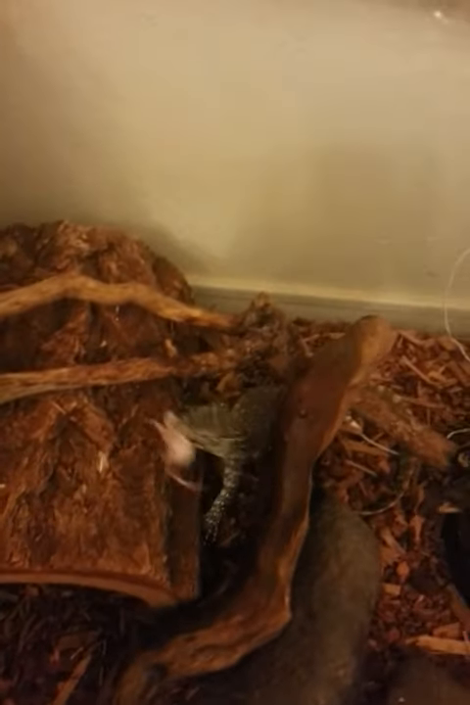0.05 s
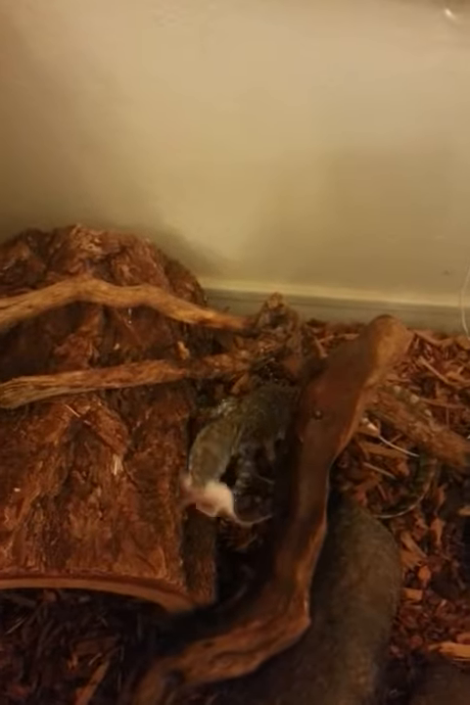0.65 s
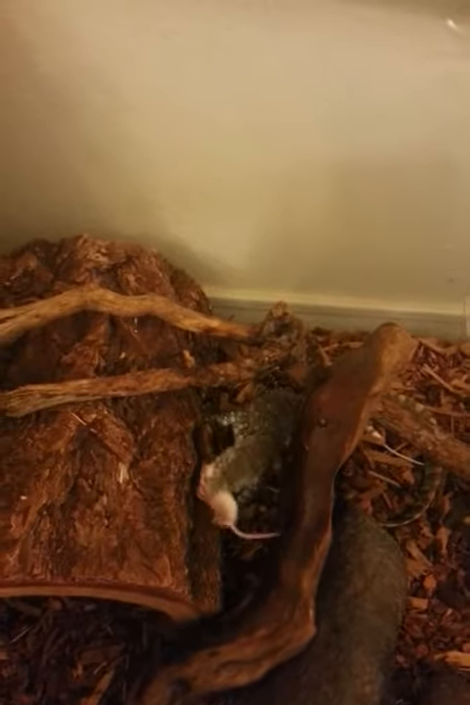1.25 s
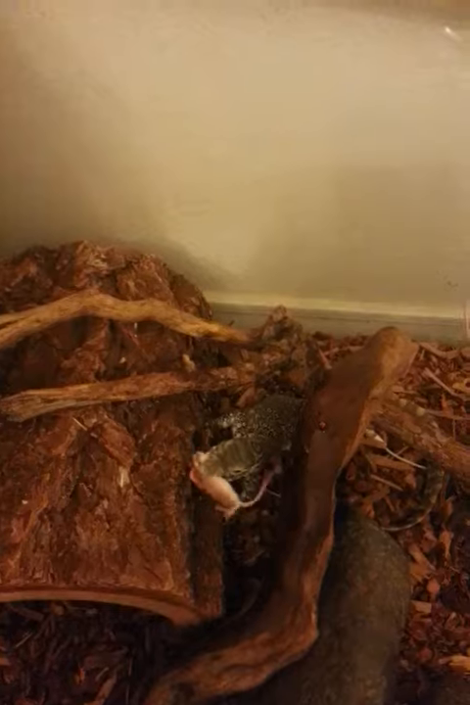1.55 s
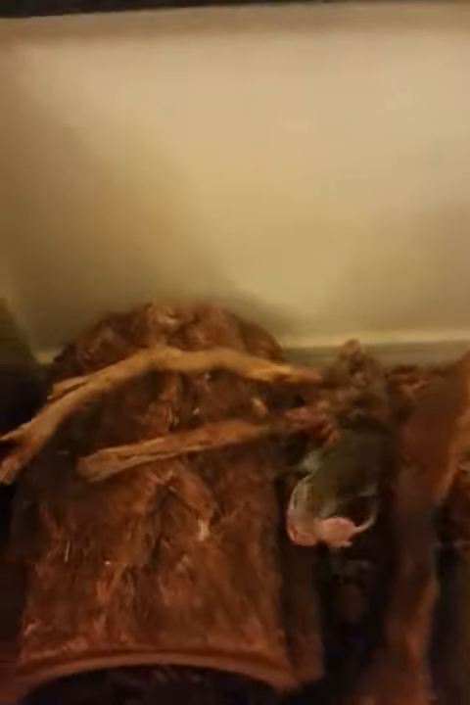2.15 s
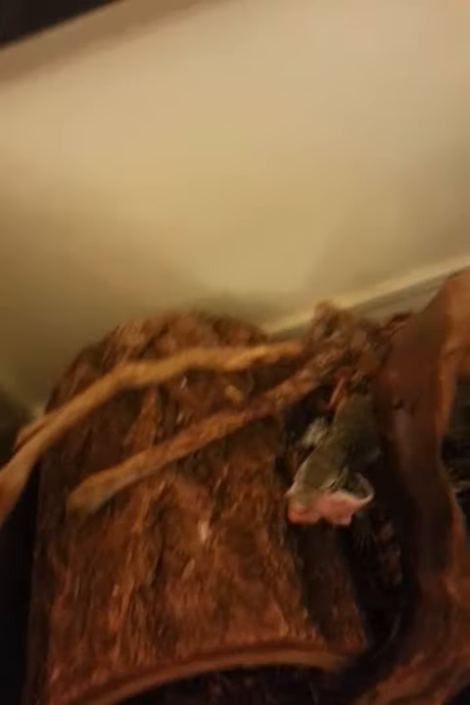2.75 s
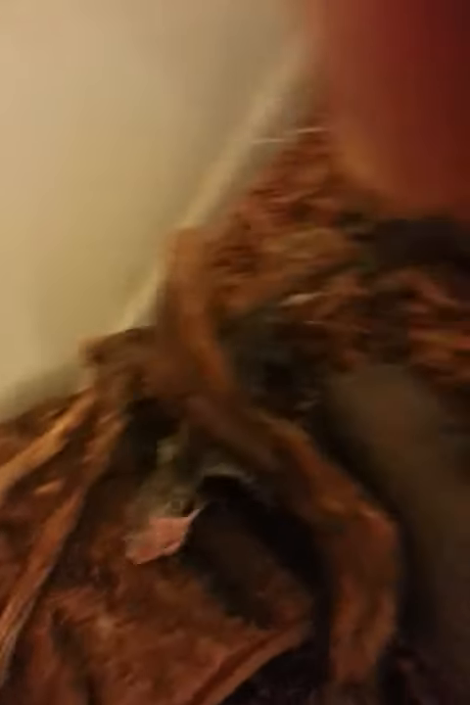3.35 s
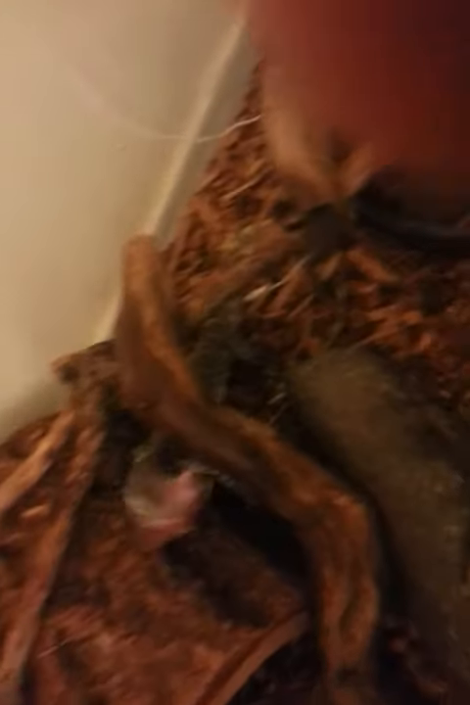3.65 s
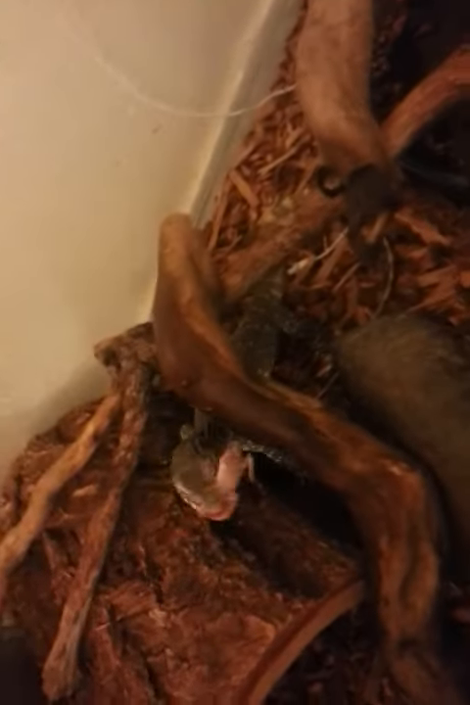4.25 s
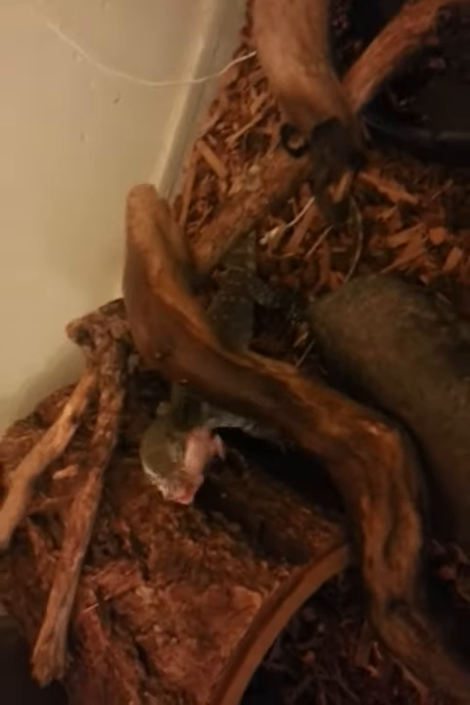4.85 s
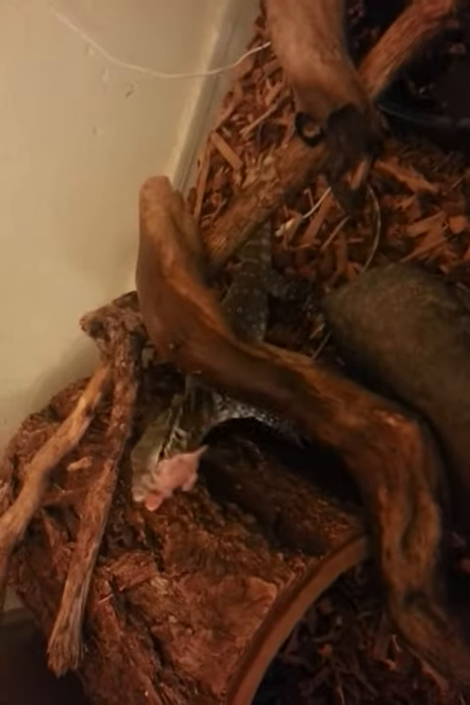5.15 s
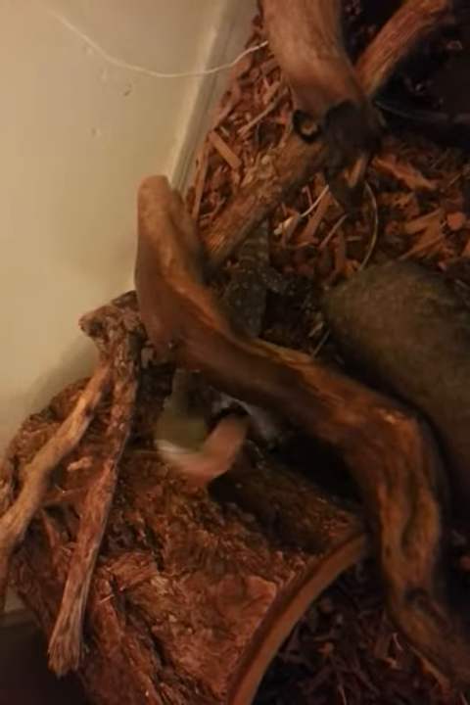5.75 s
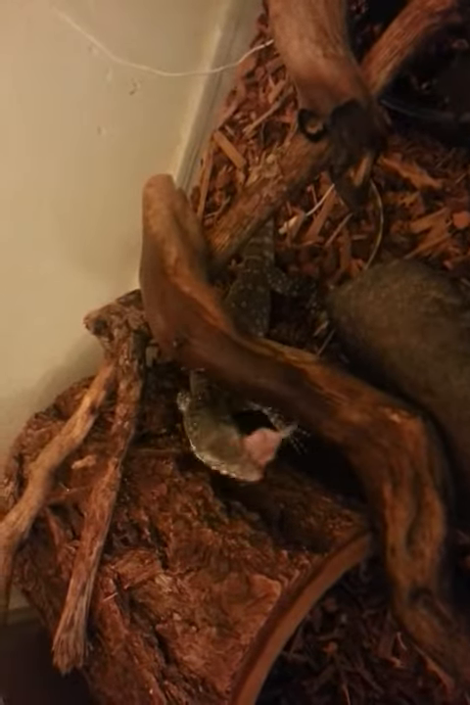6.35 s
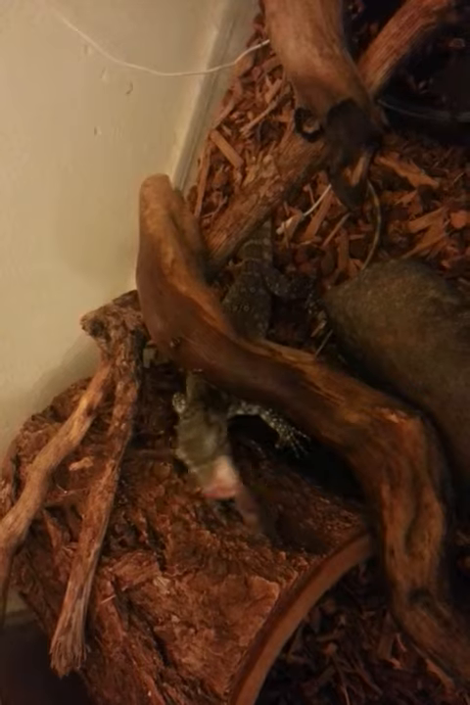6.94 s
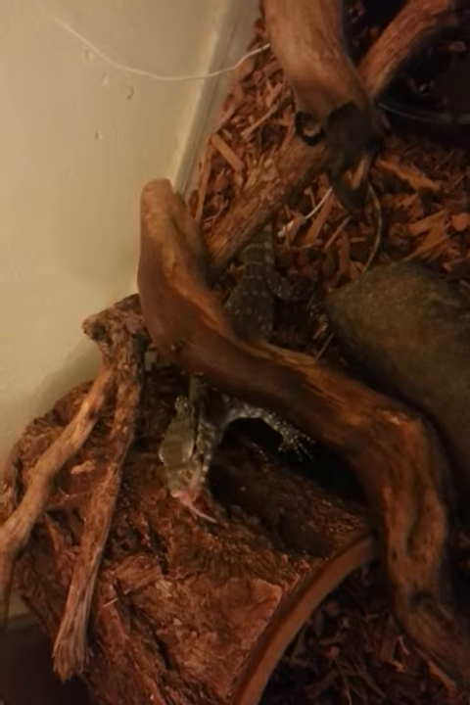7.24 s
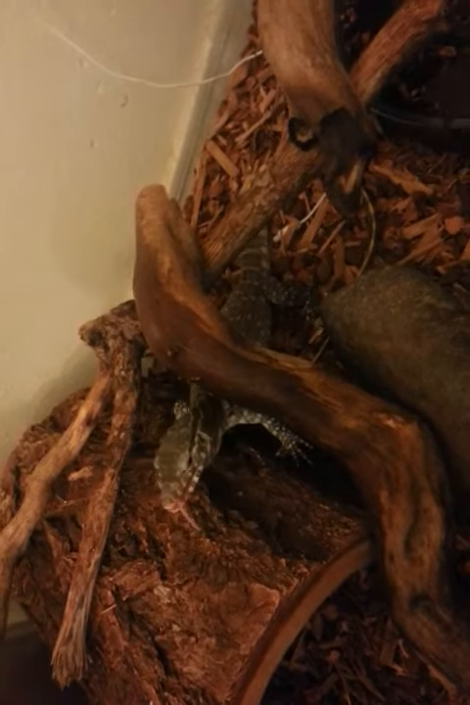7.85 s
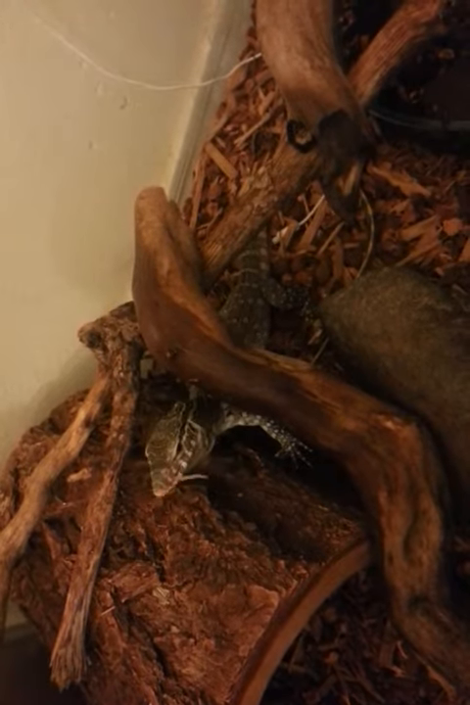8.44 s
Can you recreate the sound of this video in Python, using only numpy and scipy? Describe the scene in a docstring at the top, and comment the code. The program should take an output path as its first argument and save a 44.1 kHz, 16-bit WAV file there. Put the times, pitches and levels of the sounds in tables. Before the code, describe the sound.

A lizard scrapes and ticks on dry bark, thrashing once against ringing glass, while fingers knock and rub on the microphone.

```python
"""A lizard shakes and swallows a mouse on a cork-bark hide in a vivarium, over a faint room hum.
From the start claws and prey scrape the bark and dry chips tick; at 0.5 s one hard thrash sets
something ringing, probably the tank's glass. From 1.9 to 4.8 s fingers rub and knock beside a phone's
two microphone ports, with one long slide at 3 s. Then the lizard's scattered jerks run on to the end."""
import sys
import numpy as np
from scipy import signal
from scipy.fft import rfft, irfft, next_fast_len
from scipy.io import wavfile

SR = 44100
rng = np.random.default_rng(int(sys.argv[2]) if len(sys.argv) > 2 else 0)


def unload_audio(sound):
    """Save the sound as a 16-bit wav file, at the path given as the first command line argument."""
    columns = np.transpose(np.atleast_2d(sound))
    # keep every value between -1 and 1, then stretch to whole-number steps
    steps = np.round(np.clip(columns, -1, 1) * 32767)
    wavfile.write(sys.argv[1], SR, steps.astype(np.int16))


N = 373968
TIME = np.arange(N) / SR

# the lizard's jerks, each a scrape that swells until a claw or chip snaps:
# (snap time [s], scrape level [dB], rise [s], snap level [dB], left minus right [dB])
JERKS = [(0.0345, -46, 0.006, -46.5, 8), (0.327, -58, 0.028, -50.5, -3), (0.34, -55.5, 0.0022, -57, -4),
         (0.398, -30.5, 0.015, -34.5, -10), (0.485, -54, 0.028, -62, 6), (0.751, -44, 0.02, -45.5, -4),
         (0.82, -42.5, 0.034, -42, -4), (0.8565, -65, 0.012, -45.5, -12), (0.907, -52, .011, -51, -3.5),
         (1.06, -41.5, 0.0035, -41.5, -4.5), (1.1982, -58, 0.014, -51.5, -1), (1.235, -46, 0.012, -63, -8),
         (1.264, -52, 0.0085, -49, 2.5), (1.2795, -64, .008, -51, 2.5), (1.394, -62, 0.037, -73, -2),
         (1.6903, -52.5, 0.018, -39.5, 0.5), (1.748, -57, 0.034, -58, -10), (2.1093, -54, .02, -50, -2.5),
         (2.494, -45.5, 0.0085, -60, -1.5), (4.817, -50.5, 0.0039, -73, -8), (4.8728, -48, 0.036, -49, -8),
         (4.942, -61, 0.0032, -56.5, -2), (5.2857, -35, 0.0062, -40, -1.5), (5.349, -61, 0.073, -60, 2.5),
         (5.42, -80, 0.0047, -67, 8), (5.614, -63, 0.021, -55, -1), (5.744, -46, 0.012, -54, -5.5),
         (5.8178, -50, 0.0092, -44.5, -2.5), (6.2622, -49, 0.0069, -50.5, -5), (6.313, -64.5, .012, -67, 7),
         (6.489, -58, 0.015, -51.5, 2.5), (6.76, -61, 0.007, -70, -7.5), (6.8077, -40.5, 0.011, -37.5, 3),
         (7.212, -46.5, .012, -61, -8.5), (7.2443, -46.5, 0.0099, -43.5, 2.5),
         (7.8035, -46.5, .013, -50.5, 0), (8.1607, -54.5, .002, -51.5, -6), (8.1966, -47, 0.016, -52, -5),
         (8.2363, -72, 0.014, -50.5, 2)]
# crisp spectrum of dry bark: (frequency [Hz], level [dB])
BARK = [(1500, -35.5), (3200, -20), (4300, -2.5), (5800, -0.5), (8000, 0), (10000, -1.5), (12500, -1.5),
        (14500, -3.5)]
# woody spectrum of the hollow hide: (frequency [Hz], level [dB])
HOLLOW = [(70, -6), (180, 9.5), (400, 2), (900, -6), (1900, -2.5), (3200, -8.5), (6000, -22.5)]
# low rumble through a solid body: (frequency [Hz], level [dB])
RUMBLE = [(30, -26.5), (50, -9.5), (78, 11), (160, 2.5), (300, 0), (500, -10.5), (1000, -31.5)]
RUB_DB = -47.5  # an ordinary finger rub, the reference for firmer and lighter ones


def undb(db):
    """Decibels to gain."""
    return 10 ** (np.asarray(db) / 20)


def unit(x):
    """Scale to rms 1."""
    return x / np.sqrt(np.mean(x ** 2))


def pan(side_db):
    """Left and right gains of constant power."""
    return unit(undb(np.array([[side_db], [-side_db]]) / 2))


def pan_power(side_db):
    """Left and right power, averaging 1, for a steady or moving lean."""
    left = 2 / (1 + undb(-2 * np.atleast_1d(side_db)))
    return np.array([left, 2 - left])


def add(out, at, sound):
    """Mix a sound in from a given time."""
    i = int(at * SR)
    out[:, i:i + sound.shape[-1]] += sound[:, :N - i]


def colour(x, spectrum):
    """Shape a sound to a spectrum, at rms 1."""
    hz, db = np.transpose(spectrum)
    size = next_fast_len(x.shape[-1])
    bins = np.maximum(np.fft.rfftfreq(size, 1 / SR), 1)
    gain = undb(np.interp(np.log(bins), np.log(hz), db))
    return unit(irfft(rfft(x, size) * gain, size)[..., :x.shape[-1]])


def band(x, hz, width_hz):
    """Two-pole resonance, gain 1 at the centre."""
    return signal.lfilter(*signal.iirpeak(min(hz, .45 * SR), hz / min(width_hz, .4 * SR), fs=SR), x)


def stereo_noise(shared, size=N):
    """White noise with a share of its power common to left and right."""
    noise = rng.standard_normal((3, size))
    return np.sqrt(shared) * noise[0] + np.sqrt(1 - shared) * noise[1:]


def ringing(hz, width_hz, shared, size=N):
    """A band of noise that wavers like a cluster of close, beating modes, at rms 1."""
    once = band(stereo_noise(shared, size), hz, .92 * width_hz)
    return unit(band(once, hz, .92 * width_hz))


def friction(slips_per_s, spread_db, hiss):
    """Tiny slips of unequal size, over the hiss of those too small to tell apart."""
    slips = rng.random(N) < slips_per_s / SR
    sizes = undb(spread_db * np.minimum(rng.exponential(size=N), 4))
    energy = signal.lfilter([1], [1, -np.exp(-1 / (.0024 * SR))], (slips * sizes) ** 2)
    return np.sqrt(energy / energy.mean() + hiss ** 2) * stereo_noise(.075)


def stroke(at, rise, fall, roundness=1, size=N):
    """Contact pressure that builds to a peak and lets go; soft things give a rounder peak."""
    press = np.zeros(size)
    near = slice(max(int((at - 9 * rise) * SR), 0), min(int((at + 9 * fall) * SR), size))
    t = TIME[near] - at
    press[near] = np.exp(-np.maximum(-t / rise, t / fall) ** roundness)
    return press


def room(air_db=-68, hum_db=-5, hum_width_hz=14):
    """Room tone: a centred rumble under wide hiss and the wavering hum of appliances."""
    # bed of air: (frequency [Hz], level [dB])
    air_spectrum = [(20, -26), (45, -4.5), (75, 5.5), (110, -4.5), (200, -11.5), (310, -12), (500, -13.5),
                    (800, -17.5), (1500, -20), (3000, -21), (7500, -21), (14500, -22.5)]
    # appliance tones: (frequency [Hz], level [dB])
    hum_tones = [(75.4, -70.5), (118.4, -69), (177.6, -70.5), (301.5, -73), (360.7, -82.5), (479.1, -91.5)]
    noise = rng.standard_normal((3, N))
    rumble = signal.sosfilt(signal.butter(1, 400, fs=SR, output="sos"), noise[0])
    air = undb(air_db) * colour(noise[1:] + 2 * rumble, air_spectrum)
    return air + sum(undb(db + hum_db) * ringing(hz, hum_width_hz, shared=.97) for hz, db in hum_tones)


def bumps(width_s=.0038):
    """Soft, dull pushes, each a brief low swing."""
    # (time [s], peak level [dB], left minus right [dB], pitch [Hz])
    pushes = [(0.807, -43.5, 0, 196), (0.827, -43, 0, 183), (1.389, -43, 4.5, 260), (2.897, -42.5, 4, 220),
              (2.948, -26.5, 21, 165), (4.197, -37, 0, 131), (4.754, -44, -8, 129),
              (4.823, -37.5, -12, 127), (4.859, -46.5, 7, 128), (5.414, -44.5, 4, 138),
              (6.812, -47, 2, 125), (7.239, -45, 1, 123)]
    out, t = np.zeros((2, N)), TIME[:SR // 10] - .05
    for at, db, side_db, hz in pushes:
        swing = np.sin(2 * np.pi * hz * t) / np.cosh(2 * t / width_s)
        add(out, at + t[0], undb(db) * pan(side_db) * swing)
    return out


def scuffs():
    """Brief dull scrapes, each coloured by one broad cavity resonance."""
    # (peak time [s], level [dB], rise and fall [s], resonance [Hz], left minus right [dB])
    cues = [(0.54, -30.5, 0.0034, 1400, 8), (0.5484, -50, 0.0033, 378, 15), (0.75, -54, 0.0093, 1920, 1),
            (1.265, -58.5, 0.022, 1740, 2), (1.392, -46.5, 0.0025, 1660, 13.5),
            (2.83, -54.5, 0.033, 593, 5), (2.951, -48, 0.017, 585, 3), (2.991, -39.5, 0.011, 1530, -22),
            (3.304, -44, 0.014, 1220, 23), (3.627, -46, 0.027, 1080, -24)]
    out = np.zeros((2, N))
    for at, db, length, hz, side_db in cues:
        press = stroke(.5, length, length, roundness=1.4, size=SR)
        cavity = ringing(hz, .9 * hz, shared=.2, size=SR)
        add(out, at - .5, undb(db) * pan(side_db) * press * cavity)
    return out


def taps(hits, click_cycles, thump_db, crack_db, crack_s, thump_hz=265, thump_s=.0022, ordinary_db=-21):
    """A tap clicks and cracks on the case; the pressure in the port swings back as a thump."""
    out, t = np.zeros((2, N)), TIME[:SR // 20]
    grit = undb(crack_db) * np.exp(-t / crack_s) + undb(-35) * np.exp(-t / .0053)
    for at, db, side_db, hz in hits:
        click_s = click_cycles / hz
        click = np.sin(2 * np.pi * hz * t) * (t / click_s) * np.exp(1 - t / click_s)
        thump_gain = undb(thump_db - .38 * (db - ordinary_db))  # hard taps are more click than thump
        thump = -thump_gain * np.sin(2 * np.pi * thump_hz * t) * np.exp(-t / thump_s)
        crack_hz = 3300 + hz
        burst = rng.standard_normal((2, len(t))) * grit
        crack = band(band(burst, crack_hz, .86 * crack_hz), crack_hz, .86 * crack_hz)
        tap = undb(db) * pan(side_db) * (click + thump + crack)
        far = int(side_db > 0)
        tap[far] = np.roll(tap[far], 16)  # the far port hears it a phone's length later
        add(out, at, tap)
    return out


def finger_knocks():
    """Hard nails tick and soft fingertips knock; the ports leak, so the deepest lows drain away."""
    # nails on the case: (time [s], level [dB], left minus right [dB], tone [Hz])
    nail_hits = [(1.8706, -4.5, 6, 4500), (1.8823, -9.5, 27.5, 5300), (1.9556, -24, 16, 4800),
                 (2.1887, -38, 7, 4730), (3.0049, -20, -25, 7250)]
    # fingertips on the case: (time [s], level [dB], left minus right [dB], tone [Hz])
    tip_hits = [(1.9106, -0.5, 42, 3430), (1.9132, -7, 35.5, 600), (3.074, -16, 18, 2410),
                (3.0763, -27, 11, 1400), (3.1446, -28.5, 10, 1200), (3.841, -4, 37, 1930),
                (3.9909, -20, 24, 1600), (4.092, -26, -15, 2040), (4.0996, -24, -12, 836),
                (4.189, -15, -16, 2920), (4.2187, -26.5, -15, 840), (4.2522, -20, -15, 1750),
                (4.2953, -22, -16, 1560), (4.3044, -24.5, -3.5, 950), (4.3136, -25, -28, 950)]
    nails = taps(nail_hits, click_cycles=.66, thump_db=-34, crack_db=-4, crack_s=.0011)
    tips = taps(tip_hits, click_cycles=.12, thump_db=-8.5, crack_db=-17, crack_s=.0015)
    return signal.sosfilt(signal.butter(2, 70, "highpass", fs=SR, output="sos"), nails + tips)


def touches():
    """Each touch of the hand as (pressure envelope, level [dB], mids [dB], rumble [dB])."""
    # short finger rubs: (peak time [s], level [dB], rise [s], fall [s], mids [dB], rumble [dB])
    short_rubs = [(1.906, -53.5, .021, 0.06, -4.5, 7), (2.001, -70, 0.018, 0.016, -2, 24),
                  (2.205, -47.5, 0.0092, 0.05, -5.5, 10.5), (2.284, -34.5, 0.028, 0.015, -15, -6),
                  (2.621, -62, 0.042, 0.077, -10.5, -4.5), (2.823, -55.5, 0.027, 0.039, -4.5, 7),
                  (2.988, -49.5, 0.037, 0.028, -10, 3.5), (3.795, -57.5, 0.018, 0.17, -5, -0.5),
                  (3.85, -39, 0.007, 0.011, -5, 2), (3.991, -32.5, 0.02, 0.012, -5, -15.5),
                  (4.061, -42.5, 0.021, 0.023, -4, -4.5), (4.241, -55, 0.064, 0.077, -6, 10),
                  (4.503, -43.5, .011, .022, -9, -20), (4.579, -59, 0.017, 0.037, -1.5, -2),
                  (4.75, -63.5, 0.049, 0.021, -6.5, 3.5)]
    # one long slide as the phone is turned: (time [s], level [dB], rumble [dB])
    slide = [(3.04, -73.5, 11), (3.072, -49, 5), (3.12, -45, -6.5), (3.182, -53, -1.5), (3.22, -44, -10),
             (3.26, -47.5, -16), (3.274, -30.5, -21), (3.294, -38, -13), (3.362, -42, -14.5),
             (3.486, -52, -10.5), (3.552, -49, -16), (3.594, -62, 2), (3.616, -53.5, -6.5),
             (3.76, -69.5, 1.5)]
    for at, db, rise, fall, mid_db, rumble_db in short_rubs:
        yield undb(db) * stroke(at, rise, fall, roundness=1.214), db, mid_db, rumble_db
    when, level_db, rumble_db = np.transpose(slide)
    db = np.interp(TIME, when, level_db) + 1.5
    press = undb(db) * (TIME > when[0]) * (TIME < when[-1])
    mid_db = -11 - .39 * (db - RUB_DB)  # pressing harder thins the mids
    yield press, db, mid_db, np.interp(TIME, when, rumble_db)


def finger_rubs(hiss_db=-6, fizz_db=-1, judder_db=2):
    """Skin slides on the case: hiss and fizz at the nearer port, rumble through the body to both."""
    # skin's hiss: (frequency [Hz], level [dB])
    skin_hiss = [(1800, -20.5), (3000, -6), (3900, 4), (4900, -1), (6000, 1), (7500, -7), (10000, -26)]
    # its treble fizz: (frequency [Hz], level [dB])
    skin_fizz = [(5500, -22), (7500, -7), (9000, -1.5), (11000, -2), (12500, -12), (14500, -9)]
    # its midrange: (frequency [Hz], level [dB])
    skin_mids = [(250, -12.5), (600, -1), (1200, -1), (2500, 1.5), (3400, -6.5), (5500, -22)]
    # fader ride on the fizz, duller once the grip has changed: (time [s], level [dB])
    fizz_ride = [(2.3, -4), (3.21, -0.5), (3.275, -12), (3.33, -9), (3.6, -12.5), (3.98, -17), (4.2, -3),
                 (4.5, -11)]
    slips = friction(slips_per_s=1700, spread_db=1, hiss=.87)
    grip = np.interp(TIME, np.linspace(0, TIME[-1], 700), rng.standard_normal(700))
    slips *= undb(judder_db * grip)  # the finger grips and lets go unevenly
    hiss, fizz, mids, rumble = 0, 0, 0, 0
    for press, db, mid_db, rumble_db in touches():
        side_db = 14.5 + .57 * (db - RUB_DB)  # firmer rubs lean further left
        hiss = hiss + pan_power(side_db) * press ** 2
        fizz = fizz + pan_power(.7 * side_db) * press ** 2
        mids = mids + pan_power(.69 * side_db) * (press * undb(mid_db)) ** 2
        rumble = rumble + pan_power(.2 * side_db) * (press * undb(rumble_db)) ** 2
    top_db = fizz_db + np.interp(TIME, *np.transpose(fizz_ride))
    layers = [(hiss, skin_hiss, hiss_db), (fizz, skin_fizz, top_db),
              (mids, skin_mids, 0), (rumble, RUMBLE, 0)]
    return sum(undb(db) * np.sqrt(power) * colour(slips, spectrum) for power, spectrum, db in layers)


def port_resonance(x):
    """Each microphone sits behind a small cavity that rings in the treble."""
    # left port, then right: (frequency [Hz], width [Hz], lift [dB])
    cavities = [(5160, 760, 11), (7290, 850, 12.5)]
    return np.array([side + (undb(db) - 1) * band(side, hz, width_hz)
                     for side, (hz, width_hz, db) in zip(x, cavities)])


def tank_echo(x, wet_db=-13, t60=.12):
    """Close walls throw back a short, dense echo that the chips soon soak up."""
    t = TIME[:SR // 4]
    echo = rng.standard_normal((2, len(t))) * undb(-60 * t / t60) * (t > .002)
    echo /= np.sqrt(np.sum(echo ** 2, axis=1, keepdims=True))
    return x + undb(wet_db) * signal.fftconvolve(x, echo, axes=1)[:, :N]


def glass_thrash(ring_db=-12.3, clank_db=-6, contact_db=-10, wash_db=-24, wash_s=.065,
                 thud_db=-25, rattle_db=-33, boom_db=-36):
    """Chattering blows clank on the pane and leave a bright ring over a short wash of noise."""
    # blows on the glass: (time [s], level [dB], contact length [s], left minus right [dB])
    blows = [(.503, -41, .002, 8), (.5132, -29, .001, 0), (.5163, -12.5, .002, 6), (.5395, -23, .003, 11),
             (.5478, -18.5, .003, 10), (.5655, -25, .003, 6), (.6273, -17.5, .0008, 5)]
    # ringing bands after the blows: # (frequency [Hz], width [Hz], level [dB], t60 [s])
    ring_bands = [(3520, 150, -19, 0.61), (4064, 33, -12.5, 0.26), (5050, 83, -3.5, 0.17),
                  (5684, 400, -14.5, 0.22), (7060, 67, -2.5, 0.12), (7240, 210, -8.5, 0.5),
                  (7990, 340, -14.5, 0.39), (9320, 210, -3, 0.27), (11470, 390, -6.5, 0.29),
                  (13500, 690, -11, 0.091)]

    def decay(fall):
        """Ring envelope: longer contacts put in more energy, which spreads through the tank."""
        energy = 0
        for at, db, length, side_db in blows:
            swell = undb(db) * pan(side_db / 2) * stroke(at + length, length / 2, fall, size=SR)
            energy = energy + length / .0071 * swell ** 2
        return np.sqrt(energy)

    contact = sum(undb(db) * pan(side_db) * stroke(at + length / 2, length / 3, 1.2 * length, size=SR)
                  for at, db, length, side_db in blows)
    noise = stereo_noise(.03, SR)
    hollow = colour(noise, HOLLOW)
    impact = colour(noise, BARK) + undb(thud_db) * hollow
    out = (undb(contact_db) * contact + undb(wash_db) * decay(wash_s)) * impact
    out += undb(rattle_db) * decay(2.4 * wash_s) * hollow  # the hide rattles on
    out += undb(boom_db) * decay(2 * wash_s) * colour(noise, RUMBLE)  # the tank's air and floor boom
    for hz, width_hz, db, t60 in ring_bands:
        ring = undb(ring_db) * decay(t60 / np.log(1000)) * ringing(hz, width_hz, shared=.091, size=SR)
        # each blow adds a short, broad clank around every band
        clank = undb(clank_db) * contact * unit(band(noise, hz, 3 * width_hz))
        out += undb(db) * (ring + clank)
    return np.pad(out, ((0, 0), (0, N - SR)))


def dry_ticks(gain_db=1.5, snap_s=.0018, rattle_s=.008, rattle_db=-16, ring_db=7):
    """Each snap of a claw or chip is a short crack with a brief ring and a faint rattle after it."""
    out, t = np.zeros((2, N)), TIME[:3000]
    snap = np.exp(-t / snap_s)
    rattle = undb(rattle_db) * np.exp(-t / rattle_s)
    for at, _, _, db, side_db in JERKS:
        # the ring is near 5.2 kHz when the snap leans well left, otherwise near 7.4 kHz
        ring_hz = 7397 * 2 ** (.053 * rng.standard_normal())
        if side_db > 2.5:
            ring_hz = 5200
        noise = stereo_noise(.28, len(t))
        crack = band(noise * (snap + rattle), 8000, width_hz=7900)
        ring = undb(ring_db) * band(noise * snap, ring_hz, width_hz=1100)
        tick = band(crack + ring, 8200, width_hz=7400)
        attack_rms = np.sqrt(np.mean(tick[:, :80] ** 2))
        add(out, at, undb(db + gain_db) * pan(side_db) * tick / attack_rms)
    return out


def bark_scrapes(crisp_db=-6, hollow_db=-61, ordinary_db=-51.5, settle_db=-8, settle_s=.06):
    """Scales and claws slip on dry bark and the chips settle; the hollow hide answers lower down."""
    slips = friction(slips_per_s=900, spread_db=4.5, hiss=.55)
    crisp, body = 0, 0
    for at, db, rise, _, side_db in JERKS:
        press = stroke(at, rise, fall=.012 + .45 * rise, roundness=1.095)
        hollow = undb(hollow_db + .2 * (db - ordinary_db))  # the hide gains little from a harder scrape
        settle = hollow * undb(settle_db) * stroke(at, rise, settle_s)
        crisp = crisp + pan(1.5 + .76 * side_db) * np.hypot(undb(db) * press, settle)
        body = body + hollow * press
    return undb(crisp_db) * crisp * colour(slips, BARK) + pan(side_db=7) * body * colour(slips, HOLLOW)


def scene():
    """The lizard inside the tank, the hand on the phone, the room."""
    lizard = tank_echo(bark_scrapes() + dry_ticks()) + glass_thrash()
    knocks = finger_knocks()
    return port_resonance(lizard + finger_rubs()) + scuffs() + knocks + bumps() + room()


def record(dry):
    """The phone clips at full scale and cuts the top above 14.5 kHz."""
    lowpass = signal.ellip(10, .2, 90, 14500, fs=SR, output="sos")
    return signal.sosfilt(lowpass, np.clip(dry, -1, 1))


dry = scene()
out = record(dry)
unload_audio(out)
```